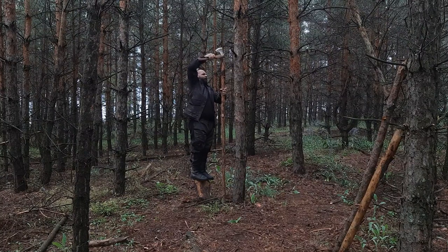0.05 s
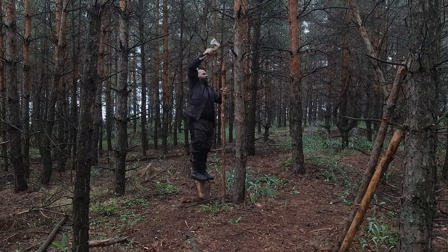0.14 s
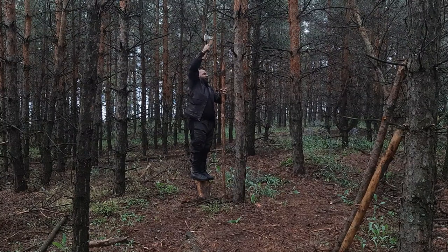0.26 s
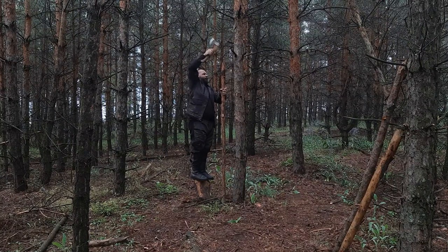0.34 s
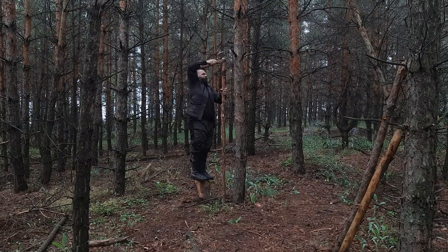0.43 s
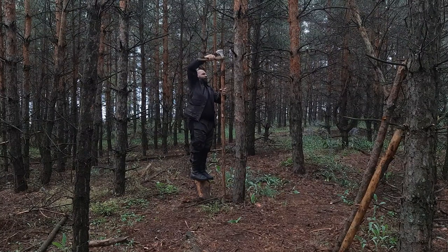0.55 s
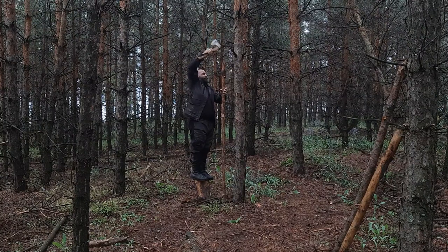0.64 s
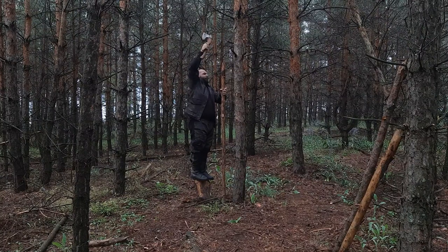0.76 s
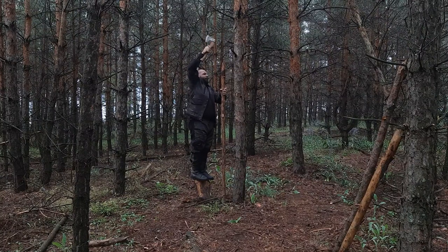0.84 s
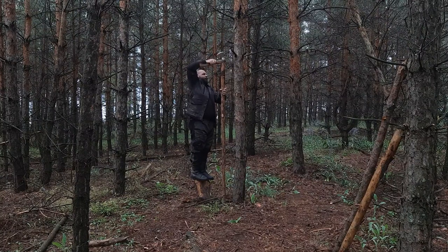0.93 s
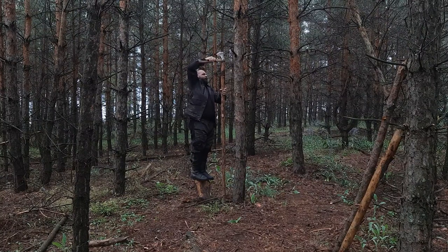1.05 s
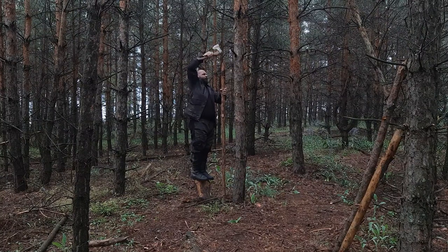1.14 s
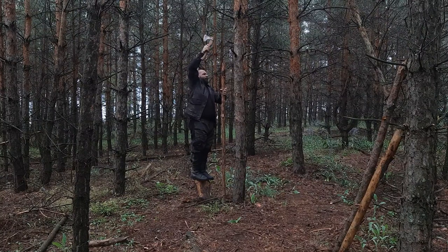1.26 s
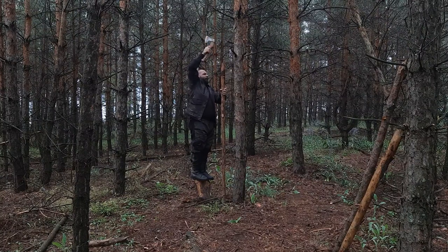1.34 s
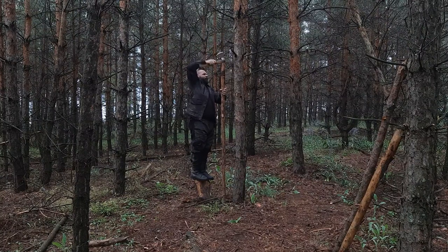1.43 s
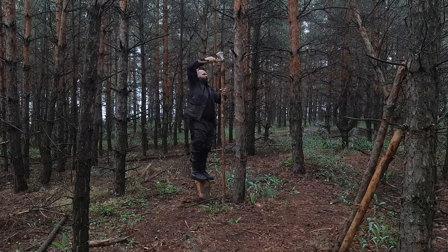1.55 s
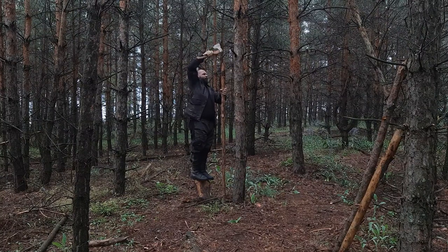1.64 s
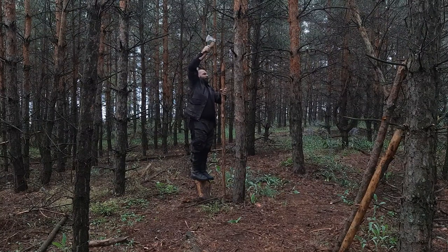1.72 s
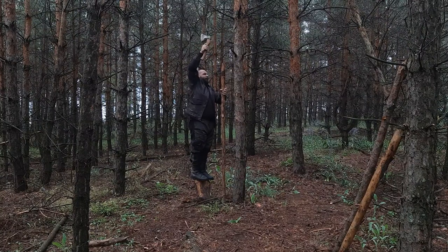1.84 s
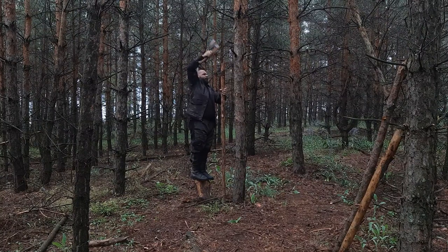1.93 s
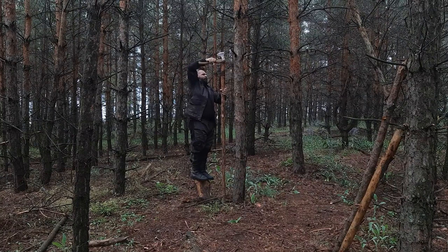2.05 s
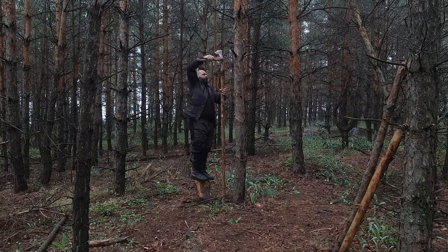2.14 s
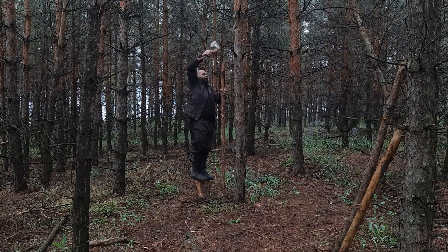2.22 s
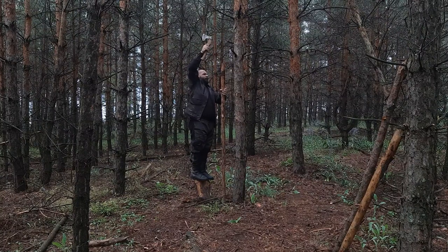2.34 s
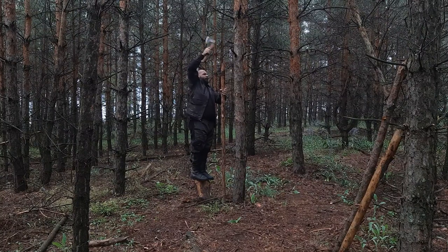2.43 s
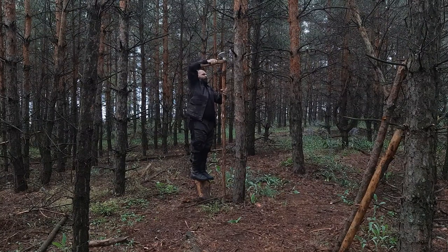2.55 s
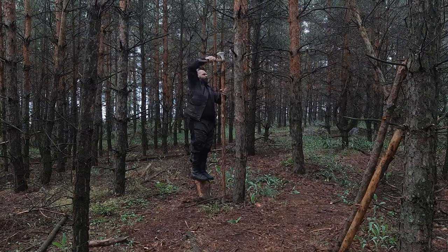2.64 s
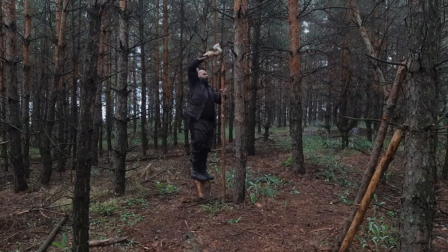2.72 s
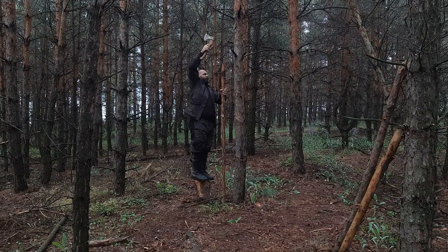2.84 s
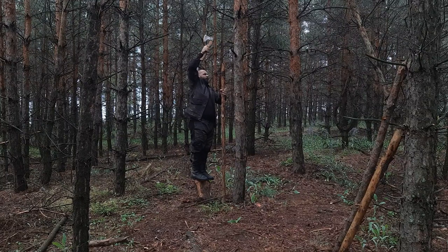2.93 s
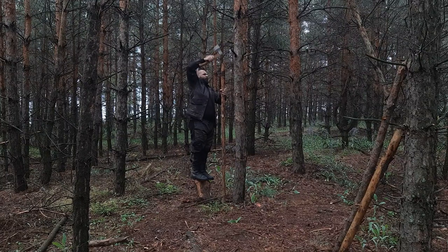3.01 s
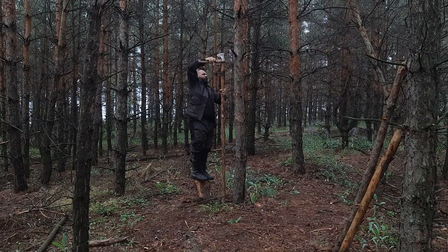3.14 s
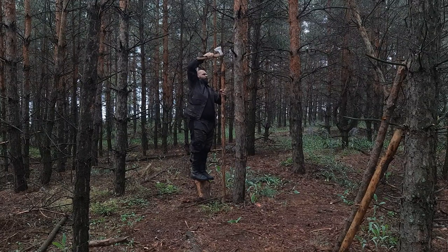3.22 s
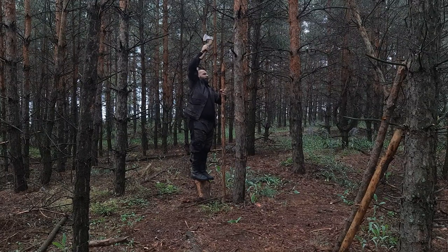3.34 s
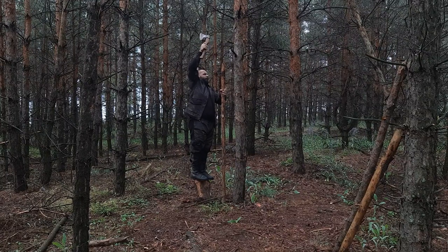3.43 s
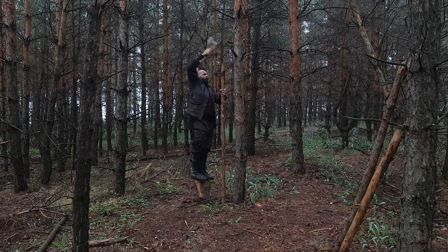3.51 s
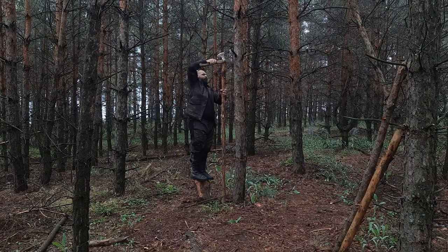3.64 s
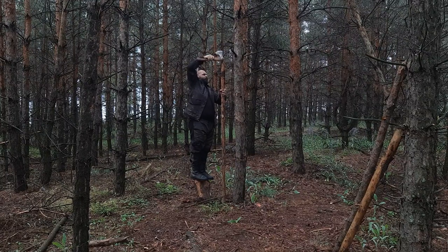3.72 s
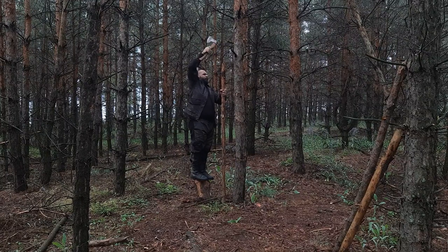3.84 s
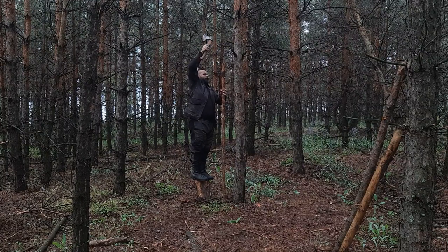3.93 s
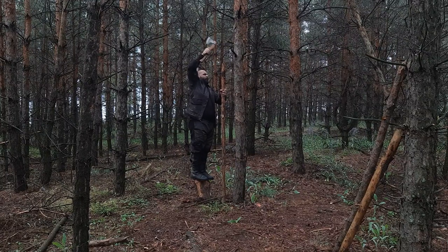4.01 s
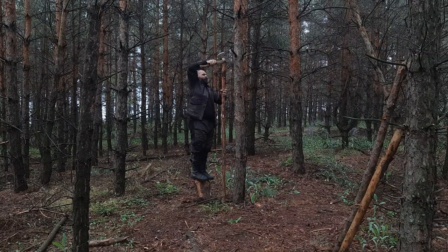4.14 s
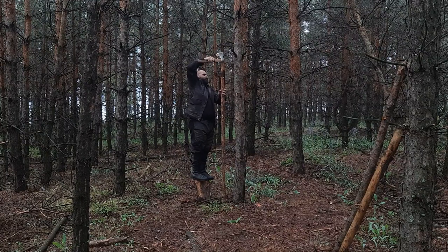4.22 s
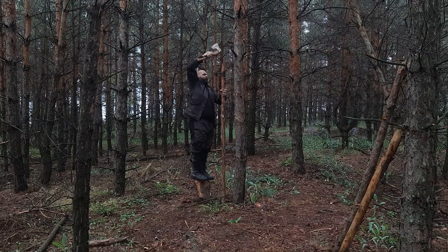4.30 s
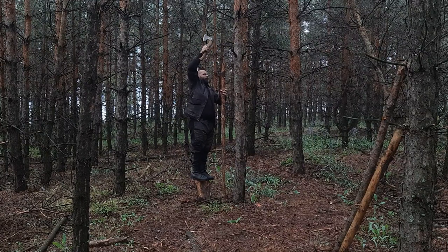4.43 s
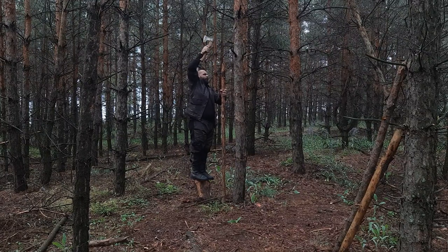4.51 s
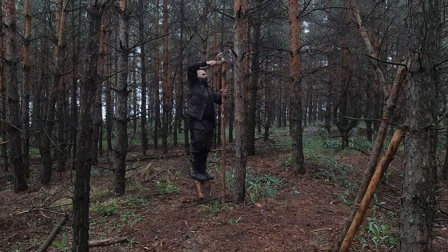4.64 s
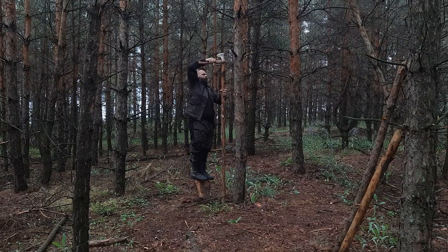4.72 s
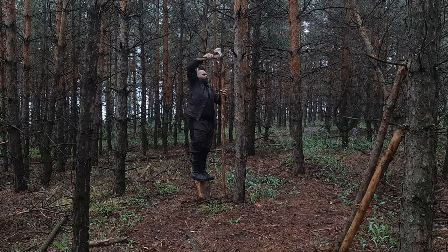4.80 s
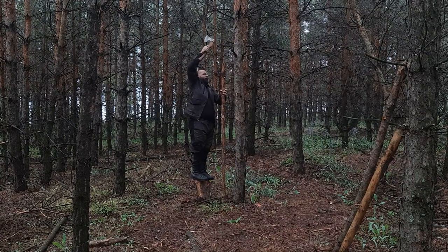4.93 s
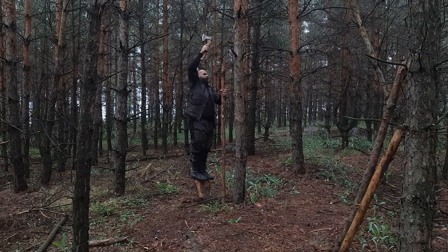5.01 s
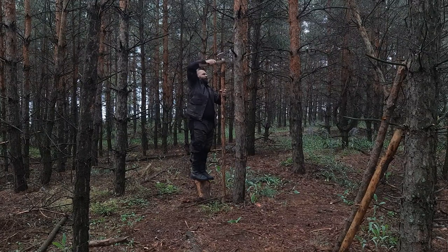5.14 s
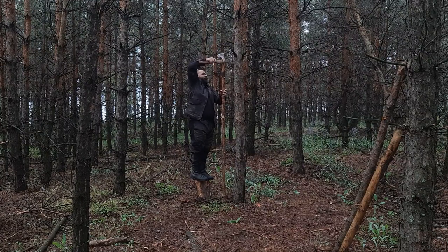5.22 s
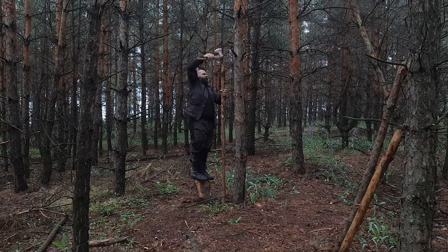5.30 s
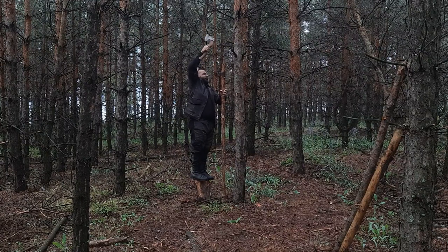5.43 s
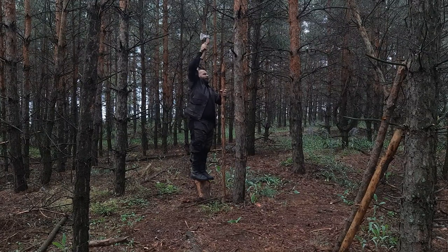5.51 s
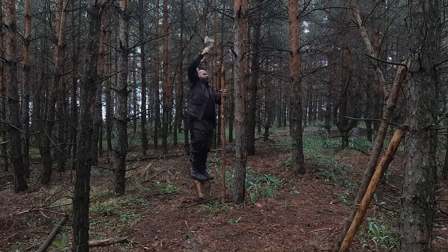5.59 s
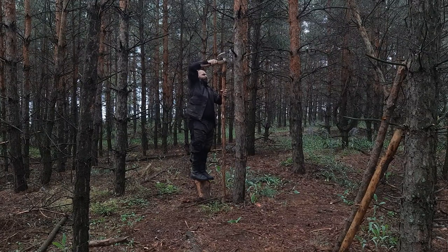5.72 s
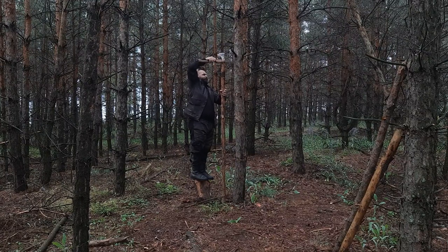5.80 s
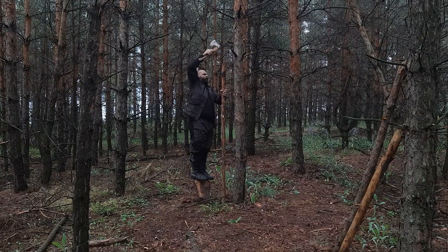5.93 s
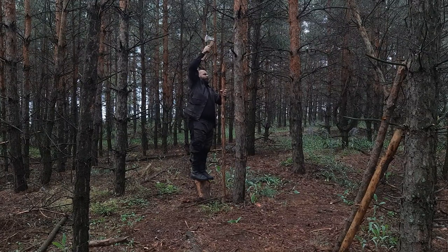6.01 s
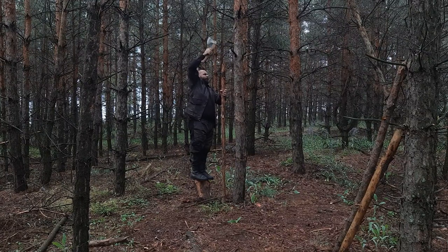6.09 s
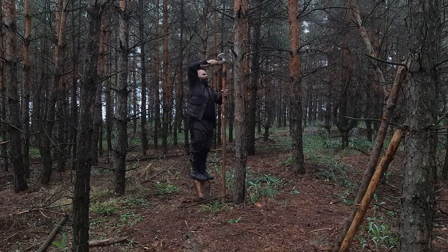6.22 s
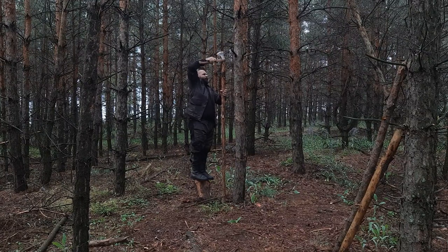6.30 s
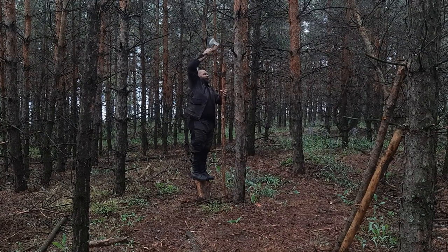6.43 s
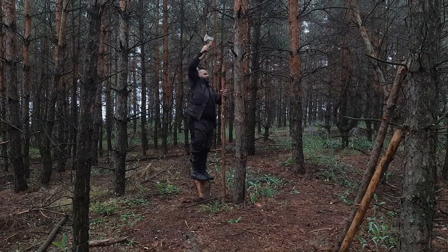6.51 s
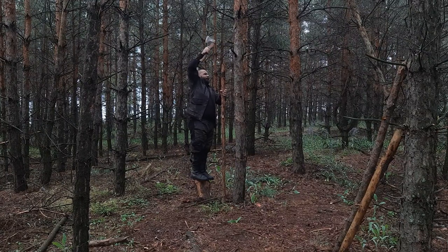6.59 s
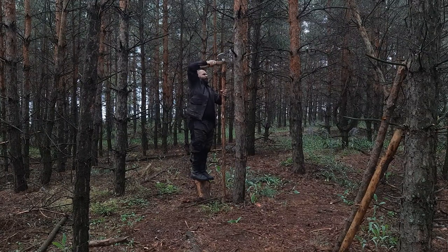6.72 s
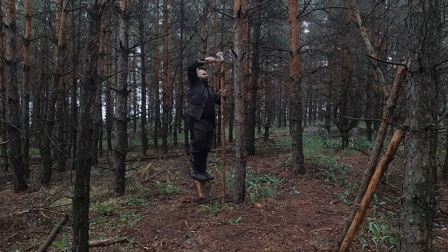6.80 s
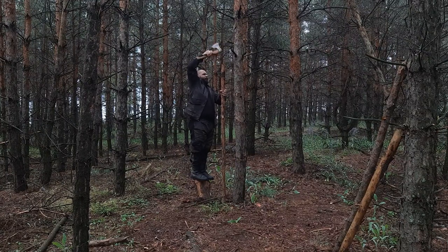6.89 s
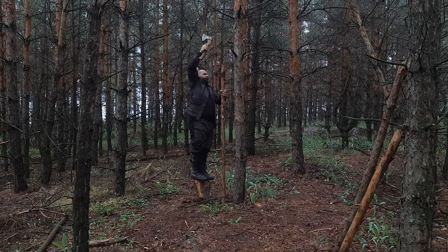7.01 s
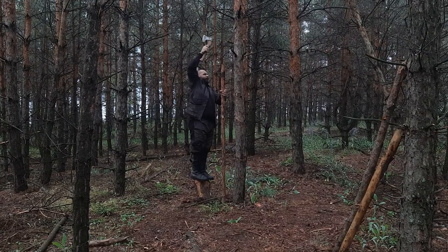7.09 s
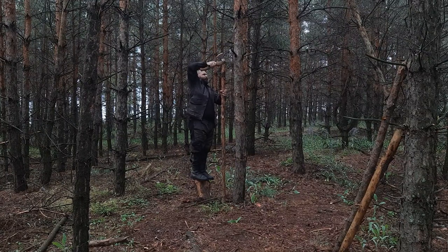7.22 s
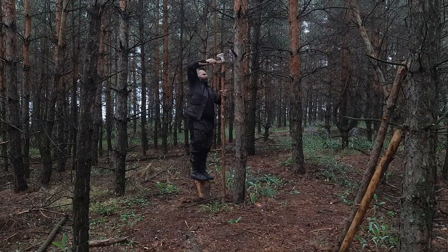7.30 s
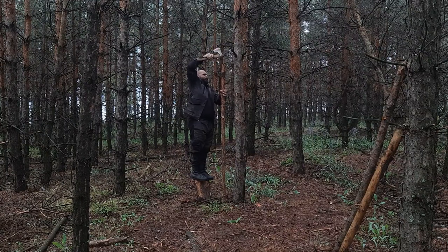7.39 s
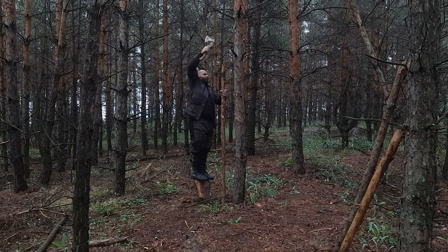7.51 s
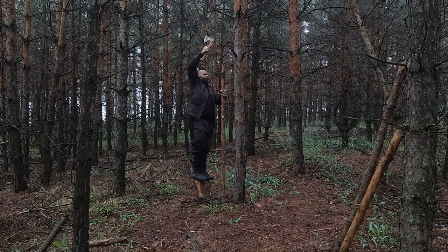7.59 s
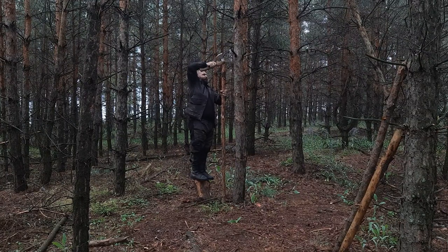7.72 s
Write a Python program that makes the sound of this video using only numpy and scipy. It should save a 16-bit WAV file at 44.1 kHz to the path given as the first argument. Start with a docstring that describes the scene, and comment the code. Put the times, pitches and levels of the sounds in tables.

```python
"""An axe chops at a standing pine, about two blows a second, some metres away in a still forest.
Each impact cracks fibres and excites the trunk's modes, a short knock and thud that the trees scatter back.
Harder blows make shorter contact and sound brighter; now and then a slab tears off with a rasp and
a hollow note. Far off, one bird repeats a buzzy trill while others chip and whistle over a faint rumble."""
import sys
import numpy as np
from scipy import signal
from scipy.fft import rfft, irfft
from scipy.io import wavfile
from scipy.ndimage import uniform_filter1d

SR = 44100
rng = np.random.default_rng(int(sys.argv[2]) if len(sys.argv) > 2 else 0)


def digitize_waveform(pressure):
    """Quantize a signal to 16-bit integers and store it at the path in sys.argv[1].

    Rows of a 2-D input are taken as channels; values are limited to [-1, 1].
    """
    field = np.atleast_2d(pressure).T
    bounded = np.clip(field, -1, 1)
    quanta = np.round(bounded * 32767).astype(np.int16)
    wavfile.write(sys.argv[1], SR, quanta)


N = 341775


def axe(sway_radians=0.9):
    """Superposition of direct and scattered sound: blows from one place raise nearly the same echoes."""
    # Axe blows. Each row: start in seconds, force in dB, dry snap of the wood in dB, crack of the fibres
    # in dB, pitch factor, frequency in Hz that has a node at the spot struck.
    blows = [(0.0525, 1.8, -3.5, -3, 1.055, 1940), (0.575, 2.7, -1, -2, 1.063, 2060),
             (1.099, -4.5, 3.5, -5, 1.027, 1090), (1.6017, -5, -2, -4, 1.05, 823),
             (2.1447, 0.5, 2.5, 3, 1.02, 1060), (2.6747, 1.5, -3, -2, 1.026, 800),
             (3.2082, -5, -4, -5, 1.062, 815), (3.739, 4, -1, -1.2, 1.045, 410),
             (4.2552, 4, 1, -0.3, 1.05, 816), (4.7846, -10, -1.5, -3.5, 1.077, 800),
             (5.3074, 5.5, 1.5, -0.5, 1.058, 904), (5.8441, 5.5, 1.5, 3, 1.05, 1820),
             (6.3369, -14, 4.5, -5, 1.135, 1380), (6.8479, 1, 0, 0.7, 1.056, 808),
             (7.3675, 2.5, 2.5, -0.6, 1.048, 2420)]
    # Slabs splitting away. Each row: start in seconds, tearing level in dB, knock level in dB.
    splits = [(0.054, -9.5, 7), (2.1465, 0, 31), (3.741, 0.5, 22), (5.31, -2, 22)]
    # Scatter from nearby trunks. Each row: frequency in Hz, gain in dB, reverberation time in seconds.
    near_trees = [(32, -14, 0.36), (54, -4.5, 0.43), (127, -14, 0.4), (260, -23, 0.32), (363, -13, 0.22),
                  (497, -4, 0.46), (704, -7, 0.31), (846, -4.5, 0.36), (1030, -10.5, 0.31),
                  (1690, -7.5, 0.3), (2250, -8, 0.4), (3060, 1, 0.57), (6240, -6, 0.32), (9800, -1.5, 0.41),
                  (15500, 2, 0.38)]
    # Echo from deep in the forest. Each row: frequency in Hz, gain in dB, reverberation time in seconds.
    far_trees = [(124, -35.5, 1.7), (286, -40.5, 0.59), (543, -15, 0.9), (690, -22.5, 1.6),
                 (863, -17, 0.99), (1510, -24.5, 1.16), (1910, -13.5, 0.75), (2600, -19, 0.93),
                 (3500, -20.5, 0.71), (9000, -18.5, 2.3)]
    forest, swaying = (scatter(near_trees, build_s=0.0012) + scatter(far_trees, build_s=0.05)
                       for _ in range(2))
    still_echoing = (-.47, *blows[0][1:])  # a blow just before the scene opens
    sounds = [(s, *blow(s, *stroke)) for s, *stroke in [still_echoing, *blows]]
    sounds += [(s, *split(tear_db, knock_db)) for s, tear_db, knock_db in splits]
    track = np.zeros(N + SR)
    for s, direct, all_round in sounds:
        # moving air and branches change the echoes a little from blow to blow
        turn = sway_radians * rng.standard_normal()
        echoes = np.cos(turn) * forest + np.sin(turn) * swaying
        add(track, s, direct)
        add(track, s, signal.fftconvolve(all_round, echoes))
    return track


def blow(s, force_db, snap_db, crack_db, pitch, node_hz, lag_s=0.00202, bounce_s=.0016, size=8192):
    """Impact excites the trunk's modes and breaks fibres; returns the direct and the all-round sound."""
    # Modes of the trunk with the axe in it. Each row: frequency in Hz, width in Hz, level in dB.
    trunk = [(120.6, 134, 27), (180.3, 80, 30), (266, 55, 28.5), (461, 100, 12.5), (678.2, 89.5, 27.5),
             (824, 57, 23), (971, 215, 24.5), (1277, 156, 24.5), (1439, 207, 22.5), (1655, 260, 14.5),
             (1982, 88, 13), (2143, 120, 10), (2449, 170, 3.5), (2970, 150, -17)]
    hz = np.fft.rfftfreq(size, 1 / SR) + 1e-3
    # the depth of the bite retunes the upper modes; the low ones belong to the whole trunk
    tuned = [(f * pitch if f > 400 else f, width, db) for f, width, db in trunk]
    power = sum((amp(db) * abs(resonance(hz, f, width)) ** 2) ** 2 for f, width, db in tuned)
    # a mode with a node under the blade is barely driven
    node = 1 - .9 * bump(hz, node_hz, width_hz=90)
    # a harder blow makes a shorter contact, which drives the upper modes more
    bright_db = force_db / (1 + (1070 / hz) ** 3.9)
    # the top of the thud starts thin and fills out over the first blows
    fill_db = (1 - 4.5 * np.exp(-s / 1.8)) * bump(hz, centre_hz=290, width_hz=66)
    colour = amp(bright_db + fill_db + snap_db * bump(hz, centre_hz=2200, width_hz=310))
    # dispersion: low bending waves are slower, so the thud follows the knock (lag_s holds at 1 kHz)
    travel = np.exp(-4j * np.pi * lag_s * np.sqrt(1000 * hz))
    # quick reflections draw the knock out over a few milliseconds (an all-pass)
    delay = np.exp(-2j * np.pi * hz * bounce_s)
    spread = (delay - .66) / (1 - .66 * delay)
    wood = minimum_phase(np.sqrt(power) * colour * node) * travel * spread
    crack, snaps = fibres(hz, crack_db, bounce_s, size)
    direct = wood + crack * snaps
    # taken over all directions, the peaks of the wood and the ragged colour of the snaps even out
    blurred = np.where(hz > 400, uniform_filter1d(power, size=35), power)
    all_round = minimum_phase(np.sqrt(blurred * colour ** 2 + abs(crack) ** 2)) * travel
    return irfft(direct)[:size // 2], irfft(all_round)[:size // 2]


def fibres(hz, crack_db, bounce_s, size, decay_s=.0016):
    """A crack of fibres and its ground reflection just after; returns smooth colour and noise spectrum."""
    # Spectrum of splitting fibres. Each row: frequency in Hz, level in dB.
    crack = [(1200, -15), (2700, -11.5), (4300, -10.5), (6000, -6), (7800, -10.5), (9000, -15.5),
             (12000, -21.5), (15500, -27)]
    t = np.arange(size) / SR
    burst = np.exp(-t / decay_s)
    bounce = 0.29 * (t > bounce_s) * np.exp(-abs(t - bounce_s) / decay_s)
    snaps = (burst + bounce) * rng.standard_normal(size)
    return minimum_phase(amp(curve(crack, hz) + crack_db)), rfft(snaps / np.linalg.norm(snaps))


def split(tear_db, knock_db, decay_s=0.0039, size=8192):
    """A slab tears loose with a rasp and rings in one mode; returns the direct and the all-round sound."""
    hz, t = np.fft.rfftfreq(size, 1 / SR) + 1e-3, np.arange(size) / SR
    rasp = np.exp(-t / decay_s) * rng.standard_normal(size)
    tear = amp(tear_db) * resonance(hz, centre_hz=2750, width_hz=1400) ** 2
    knock = amp(knock_db) * resonance(hz, centre_hz=796, width_hz=110) ** 2
    direct = knock + tear * rfft(rasp / np.linalg.norm(rasp))
    all_round = amp(-10) * knock + tear
    return irfft(direct)[:size // 2], irfft(all_round)[:size // 2]


def scatter(bands, build_s, clumps_db=0, size=256):
    """Multiple scattering off trunks: echoes build up, then each band decays at its own rate."""
    clumps = np.repeat(rng.standard_normal(SR // size + 1), size)[:SR]
    reflections = rng.standard_normal(SR) * amp(clumps_db * clumps)
    hz, t, frames = signal.stft(reflections, SR, nperseg=size)
    decay = amp(-60 * t / curve(bands, hz, column=2)[:, None])
    build = 1 - np.exp(-t / build_s)
    tail = signal.istft(frames * decay * build, SR, nperseg=size)[1][:SR]
    # flatten the tail's spectrum, so that the band gains alone set its colour
    spectrum, hz = rfft(tail), np.fft.rfftfreq(SR, 1 / SR)
    power = uniform_filter1d(uniform_filter1d(abs(spectrum) ** 2, size=50), size=50)
    flatten = minimum_phase(np.sqrt(power.mean() / power)) / np.sqrt(power.mean())
    fade = np.minimum(1, np.linspace(5, 0, SR))
    return irfft(spectrum * flatten * minimum_phase(amp(curve(bands, hz)))) * fade


def birds(chip_direct_db=-7, trill_direct_db=-4, whistle_direct_db=-9):
    """Distant calls in a reverberant field: the further the bird, the less arrives by the straight path."""
    # Buzzy trills. Each row: start in seconds, level in dB.
    trill_calls = [(-.06, -52.5), (1.44, -57.5), (2.249, -55.5), (3.071, -53), (3.79, -54), (4.498, -56),
                   (5.31, -52.5), (6.001, -54), (6.782, -55.5), (7.623, -55.5)]
    # Two-voiced chips. Each row: start in seconds, level of the upper voice in dB.
    chip_calls = [(0.176, -64.5), (1.385, -67.5), (3.93, -68), (5.015, -71.5), (6.214, -69), (7.524, -65)]
    # Thin whistles. Each row: start and length in seconds, first and last pitch in Hz, level in dB.
    whistle_calls = [(0.157, .025, 3100, 3730, -61.5), (.358, .1, 6440, 3370, -69.5),
                     (0.668, .22, 8760, 8100, -81), (0.916, .05, 7650, 7180, -71.5),
                     (1.812, .05, 4490, 4100, -75), (1.856, .06, 7600, 7000, -70),
                     (2.85, .22, 3300, 3180, -82.5), (3.472, .23, 4110, 3350, -79),
                     (5.764, .05, 4400, 4220, -76.5), (6.1, .05, 7600, 7300, -75),
                     (6.587, .05, 4180, 3900, -75)]
    trills, chips, whistles = np.zeros((3, N + SR))
    for s, db in trill_calls:
        add(trills, s, amp(db) * trill())
    for s, db in chip_calls:
        add(chips, s, amp(db) * whistle(0.036, pitches_hz=[7850, 8650, 7900]))
        add(chips, s + .006, amp(db + 2) * whistle(.043, pitches_hz=[7250, 7300, 6350]))
    for s, length_s, start_hz, end_hz, db in whistle_calls:
        add(whistles, s, amp(db) * whistle(length_s, [start_hz, np.sqrt(start_hz * end_hz), end_hz]))
    direct = amp(chip_direct_db) * chips + amp(trill_direct_db) * trills
    direct += amp(whistle_direct_db) * whistles
    echoes = scatter([(3520, 1.0, 0.77), (7840, -5.5, .42)], build_s=0.0041, clumps_db=1.5)
    return direct + signal.fftconvolve(trills + chips + whistles, echoes)[:len(direct)]


def trill(length_s=0.2, start_hz=3520, top_hz=3835, settle_s=0.033, throb_hz=55.36, flutter_hz=80):
    """Pitch and amplitude modulation: a rising note slides down with each uneven throb of the syrinx."""
    t = np.arange(0, length_s, 1 / SR)
    throb_phase = np.cumsum(throb_hz * (1 + .17 * waver(len(t), rate=50))) / SR % 1
    carrier_hz = top_hz + (start_hz - top_hz) * np.exp(-t / settle_s)
    slide_hz = 680 * np.arcsin(1 - 2 * throb_phase) / np.pi * (1 + throb_phase / 2)
    hz = carrier_hz + slide_hz + flutter_hz * waver(len(t), rate=200)
    swell = np.sin(np.pi * t / length_s) ** .9
    pulses = 0.26 + 0.74 * np.sin(np.pi * throb_phase)
    return tone(hz, swell * pulses)


def whistle(length_s, pitches_hz):
    """A frequency glide: a soft-edged note bends along a parabola through three pitches."""
    progress = np.linspace(0, 1, round(length_s * SR))
    hz = np.polyval(np.polyfit([0, .5, 1], pitches_hz, 2), progress)
    return tone(hz, signal.windows.tukey(len(progress), .5))


def tone(hz, envelope):
    """A bird's voice as a sinusoid whose phase is the integral of its frequency."""
    return np.sqrt(2) * envelope * np.sin(2 * np.pi * np.cumsum(hz) / SR)


def air():
    """Spectrally shaped noise: far rumble, a soft murmur of the treetops and a thin even hiss."""
    # Still air and distant rumble. Each row: frequency in Hz, power density in dB per Hz.
    density = [(20, -110), (32, -101), (48, -85.5), (82, -76), (125, -100), (250, -103), (400, -106),
               (780, -97), (1200, -102), (2000, -115), (3000, -118), (4000, -113), (5000, -115),
               (8000, -115), (15000, -117)]
    hz = np.fft.rfftfreq(N, 1 / SR)
    return irfft(rfft(rng.standard_normal(N)) * amp(curve(density, hz)), N) * np.sqrt(SR / 2)


def resonance(hz, centre_hz, width_hz):
    """The response of a damped oscillator, 1 at its centre."""
    return 1 / (1 + 1j * (hz ** 2 - centre_hz ** 2) / (hz * width_hz))


def minimum_phase(gain):
    """The spectrum of the promptest causal pulse that has these gains."""
    log_gain = np.log(np.maximum(gain, 1e-4))
    mirrored = np.r_[log_gain, log_gain[-2:0:-1]]
    return np.exp(np.conj(signal.hilbert(mirrored)))[:len(gain)]


def bump(hz, centre_hz, width_hz):
    """A Gaussian curve over frequency, 1 at its centre."""
    return np.exp(-((hz - centre_hz) / width_hz) ** 2)


def waver(length, rate):
    """A random curve of about unit size that turns rate times a second."""
    t = np.arange(length) / SR
    knots = rng.standard_normal(int(t[-1] * rate) + 2)
    return np.interp(t * rate, np.arange(len(knots)), knots)


def curve(points, hz, column=1):
    """One column of a table, interpolated along a logarithmic frequency axis."""
    points = np.array(points)
    return np.interp(np.log(hz + 1), np.log(points[:, 0] + 1), points[:, column])


def amp(db):
    """Decibels to amplitude ratio."""
    return 10 ** (np.asarray(db) / 20)


def add(track, s, sound):
    """Superposes a sound on a track that begins one second early."""
    part = track[round((s + 1) * SR):][:len(sound)]
    part += sound[:len(part)]


def scene():
    """The pressures of axe, birds and air add at one listening point."""
    return ((axe() + birds())[SR:] + air())[None]


def record(dry, cutoff_hz=15600):
    """A linear-phase low-pass filter limits the bandwidth."""
    lowpass = signal.firwin(255, cutoff_hz, window=("kaiser", 9), fs=SR)
    return signal.oaconvolve(dry, lowpass[None], "same")


dry = scene()
out = record(dry)
digitize_waveform(out)
```